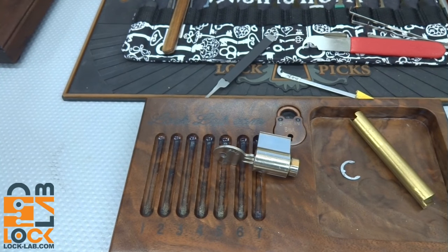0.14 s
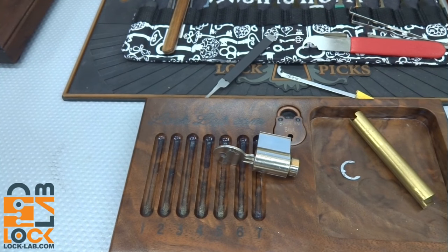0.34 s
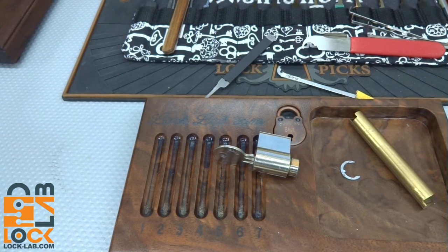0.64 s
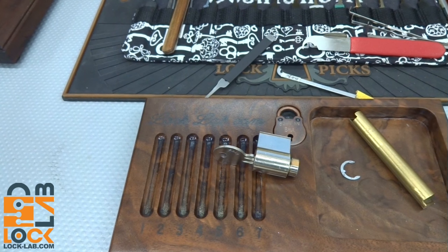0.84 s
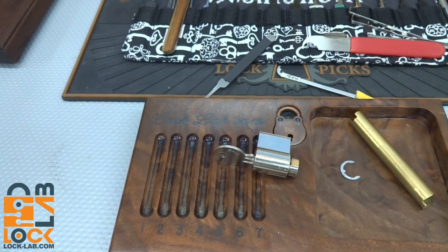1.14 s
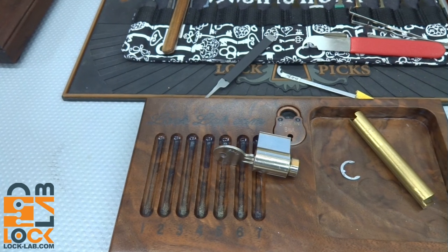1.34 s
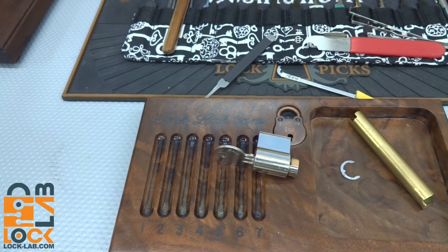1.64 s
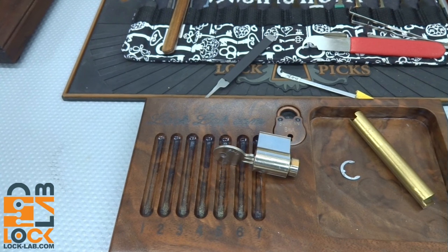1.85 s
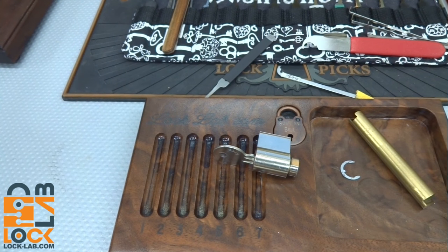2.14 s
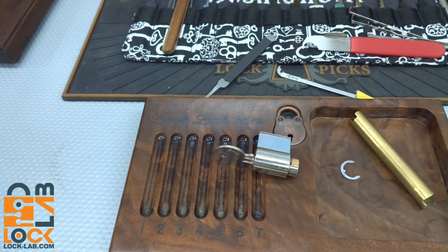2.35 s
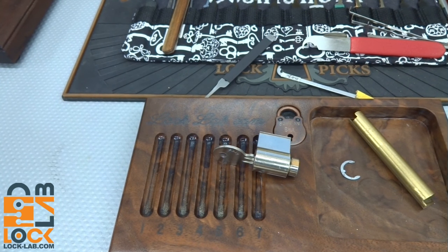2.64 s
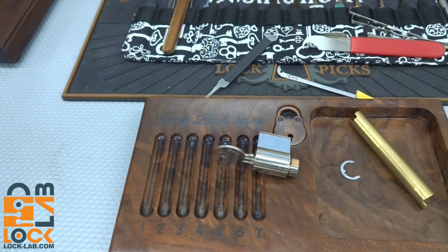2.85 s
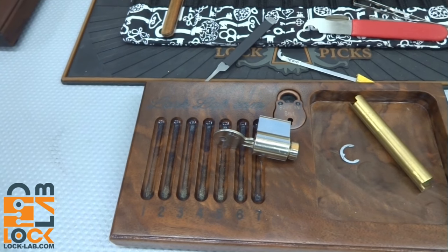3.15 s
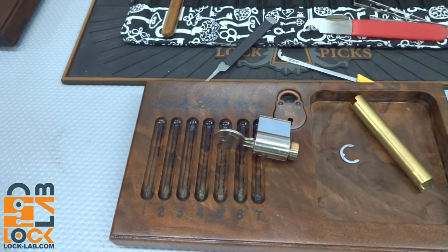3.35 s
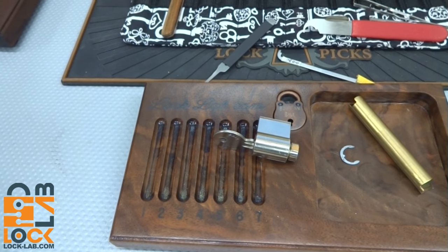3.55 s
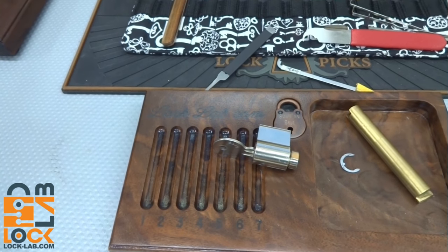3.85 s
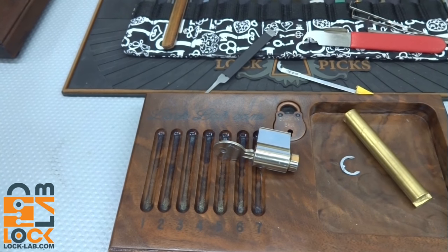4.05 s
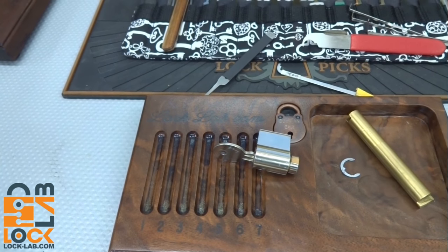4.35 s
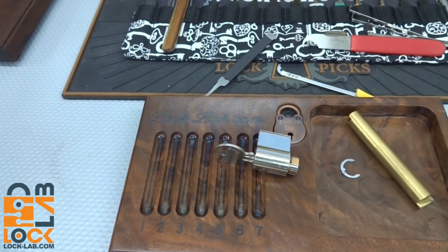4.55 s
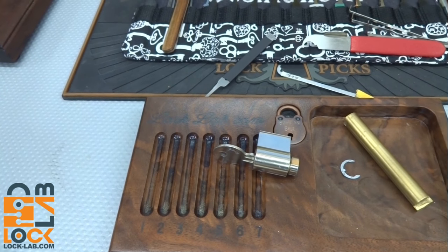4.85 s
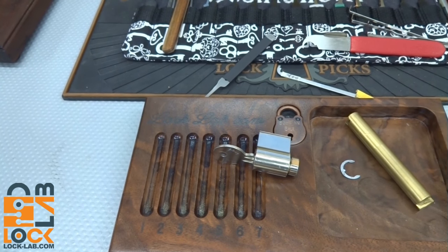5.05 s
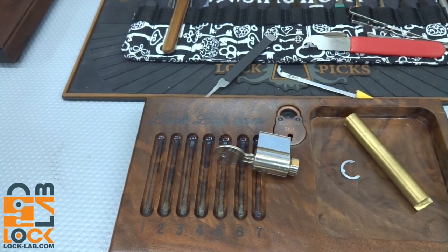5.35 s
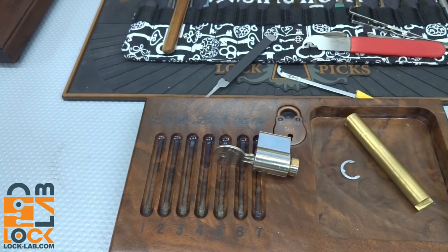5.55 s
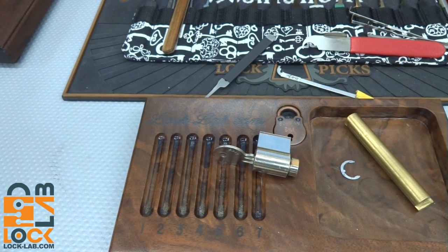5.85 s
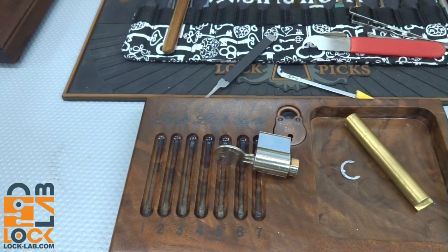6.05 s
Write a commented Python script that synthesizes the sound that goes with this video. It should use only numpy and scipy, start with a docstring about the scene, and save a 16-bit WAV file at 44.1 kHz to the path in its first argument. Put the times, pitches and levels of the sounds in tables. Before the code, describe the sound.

Metal tools clatter and scrape against wood and each other in two busy bursts, with a wavering metallic ring, tiny ticks and faint hiss.

```python
"""Small steel tools are rummaged through in a drawer: random tiny contacts, coloured by the drawer, make their
knocks, chatter and scrapes. A long bar sings while it is dragged, dangling parts tick, and thin tools ring
briefly, all as wavering modes; a tool also rasps on a wooden edge. Sparse reflections make a small hard room
over a faint hiss. The sound starts to the left, then mostly leans right, and gain control holds the blows down."""
import sys
import numpy as np
from scipy import signal
from scipy.fft import rfft, irfft
from scipy.io import wavfile
from scipy.ndimage import uniform_filter1d

SR = 44100
rng = np.random.default_rng(int(sys.argv[2]) if len(sys.argv) > 2 else 0)


def attenuation_scalar(level_db):
    """Turn a level in dB into a linear amplitude multiplier (20 dB per decade)."""
    decades = np.asarray(level_db, float) / 20
    return 10 ** decades


def wrap_up_sound(samples):
    """Save the sound to the file named by the first command line argument, as 16-bit audio."""
    columns = np.atleast_2d(samples).T
    # keep every value between -1 and 1, then stretch to whole-number steps
    tamed = np.clip(columns, -1, 1)
    steps = np.round(tamed * 32767).astype(np.int16)
    wavfile.write(sys.argv[1], SR, steps)


N = 273841  # length in samples


def evened(x):
    """Scale to an rms of one."""
    return x / np.sqrt(np.mean(x ** 2) + 1e-20)


def read(points, hz):
    """Read a curve between its points, along a logarithmic frequency axis."""
    point_hz, value = np.transpose(points)
    return np.interp(np.log(hz + 1), np.log(point_hz + 1), value)


def add(mix, start_s, sound):
    """Lay a sound into the mix, cut off where the mix ends."""
    part = mix[round(start_s * SR):][:len(sound)]
    part += sound[:len(part)]


def contacts(count, per_s, spread_db):
    """Tiny metal contacts at random moments, each a short buzz, a few of them large."""
    size_db = spread_db * np.minimum(rng.exponential(size=count), 4)
    strikes = attenuation_scalar(size_db) * (rng.random(count) < per_s / SR)
    envelope = signal.lfilter([1], [1, -np.exp(-1 / (0.0022 * SR))], strikes)  # fades over 2.2 ms
    return evened(envelope * rng.standard_normal(count))


def waver(hz, width_hz, count):
    """A mode whose strength and phase drift as the tool turns and its neighbours touch it."""
    noise = rng.standard_normal(count + 4000) + 1j * rng.standard_normal(count + 4000)
    r = np.exp(-np.pi * width_hz / SR)
    drift = signal.lfilter([1], np.convolve([1, -r], [1, -r]), noise)[-count:]
    drift = drift / abs(drift) ** 0.15  # phase roams freely, strength less far
    return evened((drift * np.exp(2j * np.pi * hz * np.arange(count) / SR)).real)


# The faint hiss's tone. Each row: frequency in Hz, relative level in dB per Hz.
HISS_TONE = [(18, -43), (30, -34), (303, -13.5), (426, -5), (584, -7.5), (721, -5), (1910, -8.5),
             (2290, -15.5), (4650, -15.5), (12600, -26), (16500, -35)]


def hiss():
    """Steady room and microphone hiss: filtered noise, mostly different in the two channels."""
    left, right, both = rng.standard_normal((3, N))
    shape = attenuation_scalar(read(HISS_TONE, np.fft.rfftfreq(N, 1 / SR)))
    noise = both + 2.8 * np.array([left, right])
    return attenuation_scalar(-56) * evened(irfft(rfft(noise) * shape, N))


# Where the wood thud, hollow knock, blow and bright jingle sit, in Hz.
COLOUR_HZ = (200, 700, 2400, 13000)


def tilt_db(hz, thud_db, knock_db, jingle_db):
    """How much wood, hollow and small steel take part, beside the blow itself at 0 dB."""
    return read(list(zip(COLOUR_HZ, (thud_db, knock_db, 0, jingle_db))), hz)


# Common colour of drawer and microphone. Each row: frequency in Hz, level in dB.
DRAWER = [(30, -27.5), (60, -17.5), (130, 4.5), (300, -1), (650, -3), (1100, -5.5), (1800, -5.5),
          (2800, -10), (4500, -9.5), (7000, -12), (11000, -13.5), (16000, -22), (22050, -55)]


def colour_db(hz, thud_db, knock_db, jingle_db):
    """The drawer's colour, tilted by the parts that join in."""
    return read(DRAWER, hz) + tilt_db(hz, thud_db, knock_db, jingle_db)


# Tools sliding over each other; heavy ones drag low and dull, light ones bright.
# Each row: time in seconds, relative scrape level in dB, weight in dB.
SCRAPE = [(0.0, -54.5, 7), (0.59, -49, 3), (0.73, -35, 6.5), (0.95, -26.5, 2), (1.16, -33, 9.5),
          (1.42, -23.5, 1.5), (1.59, -23.5, 5), (1.73, -15.5, -5), (1.85, -31, 1.5), (2.06, -56, 5),
          (2.33, -45.5, -9.5), (2.63, -33, -19), (2.96, -39, -16), (3.03, -22, 10), (3.22, -37.5, -3),
          (3.32, -21, -3), (3.531, -39, 8), (3.76, -26.5, -3.5), (3.98, -31.5, -3.5), (4.201, -42, -1.5),
          (4.439, -39, 4), (4.62, -48, 10.5), (4.9, -53.5, 1), (5.14, -46, -16), (5.31, -43, -5.5),
          (5.6, -64, 1), (6.21, -58, -15.5)]
# Colour at weight 0: wood thud, hollow knock and bright jingle, in dB.
SCRAPE_COLOUR_DB = (-18, -4, -3.5)
# Change of thud, knock and jingle, in dB for one dB of weight.
WEIGHT_SHARE = (1.25, 0.72, -0.75)


def scrape():
    """Dense sliding contacts whose colour follows the weight being dragged, in drifting patches."""
    hz, t, z = signal.stft(contacts(N, 1500, 0.5), SR, nperseg=512, noverlap=384)
    s, *columns = np.transpose(SCRAPE)
    level_db, weight_db = (np.interp(t, s, column) for column in columns)
    weight_colour_db = np.outer(tilt_db(hz, *WEIGHT_SHARE), weight_db)
    field_db = colour_db(hz, *SCRAPE_COLOUR_DB)[:, None] + level_db + weight_colour_db
    patches = uniform_filter1d(rng.standard_normal(z.shape), size=3, axis=0)
    patches = evened(uniform_filter1d(patches, size=16, axis=1))
    gain = attenuation_scalar(field_db + 2.74 * patches + 10)
    return signal.istft(z * gain, SR, nperseg=512, noverlap=384)[1][:N]


# How fast the room dies away. Each row: frequency in Hz, time to fall 60 dB in seconds.
ROOM = [(150, 0.44), (700, 0.41), (2500, 0.43), (6000, 0.36), (14000, 0.35)]
# How unlike the echoes are at the two microphone ports. Each row: frequency in Hz, level in dB.
WIDTH = [(60, -37), (200, -31), (600, -11), (2000, -11.5), (6000, -8), (14000, -8.5)]


def room(x):
    """Sparse reflections of random sign, each band dying at its own speed; one tail shared, one opposed."""
    taps = np.zeros((2, SR // 2))
    slots = np.arange(200, SR // 2 - 20, 20)
    at = slots + rng.integers(0, 20, (2, len(slots)))
    np.put_along_axis(taps, at, rng.choice([-1., 1.], at.shape), 1)
    hz, t, z = signal.stft(taps, SR, nperseg=256)
    z[1] *= attenuation_scalar(read(WIDTH, hz))[:, None]
    fade = attenuation_scalar(-60 * t / read(ROOM, hz)[:, None])
    tail = signal.istft(z * fade, SR, nperseg=256)[1]
    tail = tail / np.linalg.norm(tail[0])
    shared, unlike = signal.fftconvolve(x[None], tail, axes=1)[:, :N]
    return np.array([shared + unlike, shared - unlike])


# Where the hand works. Each row: time in seconds, left minus right in dB.
LEAN = [(0.0, 2.5), (0.5, -2.5), (3.2, -2.5), (3.8, -0.6), (4.35, -3), (4.66, 0), (4.87, -3), (6.2, -1)]


def lean(heard):
    """Tip the sound left or right, except the bass: long waves reach both ports alike."""
    bass = signal.lfilter(*signal.butter(1, 250, fs=SR), heard)
    lean_db = np.interp(np.arange(N) / SR, *np.transpose(LEAN))
    return bass + (heard - bass) * attenuation_scalar(np.outer([.5, -.5], lean_db))


def minimum_phase(level_db):
    """Turn a colour into a filter of unit energy that answers as early as it can."""
    cepstrum = irfft(np.log(attenuation_scalar(level_db)))
    cepstrum[1:1024] *= 2
    cepstrum[1025:] = 0
    causal = irfft(np.exp(rfft(cepstrum)))
    return causal / np.linalg.norm(causal)


def ringing_parts(t):
    """The blow itself, then a handful of small parts ringing for an instant at scattered pitches."""
    part_hz = np.geomspace(400, 14000, num=50)[:, None] * rng.uniform(0.93, 1.04, (50, 1))
    part_db = 3 * rng.standard_normal((50, 1))
    parts = (attenuation_scalar(part_db - 60 * t / 0.036) * np.sin(2 * np.pi * part_hz * t)).sum(0)
    parts = .33 * parts / np.linalg.norm(parts)
    parts[0] += 1
    return parts


# Modes of the wooden top. Each row: frequency in Hz, relative level in dB, time to fall 60 dB in seconds.
TABLE_TOP = [(70, -12.5, 0.26), (135, -2.5, 0.15), (263, -4, 0.63), (355, -4, 0.099)]


def hit(db, thud_db, knock_db, jingle_db, t60):
    """A blow and the chatter after it pass the drawer colour, briefly ringing parts and the table top."""
    t = np.arange(SR // 3) / SR
    rise_s = 0.003 * attenuation_scalar(-.45 * (db + 11.5))  # hard blows start sharply, light ones slide in
    chatter = contacts(len(t), 2500, 1.5) * attenuation_scalar(-60 * t / t60) * np.minimum(t / rise_s, 1)
    drawer = minimum_phase(colour_db(np.fft.rfftfreq(2048, 1 / SR), thud_db, knock_db, jingle_db))
    modes = sum(attenuation_scalar(d - 60 * t / ring_s) * np.sin(2 * np.pi * f * t) for f, d, ring_s in TABLE_TOP)
    body = modes * attenuation_scalar(thud_db - 34.5)
    add(body, 0, signal.fftconvolve(drawer, ringing_parts(t[:4096])))
    return attenuation_scalar(db - 1.5) * signal.fftconvolve(chatter, body)


# Steel meets steel. Each row: start in seconds, relative blow level in dB, hollow knock and bright jingle
# in dB beside the blow, time for the chatter to fall 60 dB in seconds.
CLACKS = [(0.079, -32, -9.5, -10.5, 0.53), (0.1192, -32, -2.5, -17, 0.24), (0.5251, -36.5, -8, 5, 0.14),
          (0.619, -28, -4, -3, 0.16), (0.66, -23, -4, 0, 0.086), (0.8076, -18.5, -48, -4, 0.23),
          (0.849, -7.5, -23, -22, 0.043), (1.05, -24.5, -26, -9, 0.1), (1.229, -26.5, -11, 26, 0.068),
          (1.4172, -15.5, -12, -2.5, 0.26), (1.4694, -16, -28, -5, 0.17), (1.6114, -10.5, 2, 1, 0.13),
          (2.0686, -33, -25, 11, 0.13), (2.108, -28.5, -21, -1, 0.052), (3.005, -21, -8, 15, 0.35),
          (3.357, -15, -4, 21, 0.16), (3.43, -24, -8, 16, 0.15), (3.5501, -12, -15, 0, 0.18),
          (3.618, -19.5, -1, 0, 0.058), (3.7886, -9.5, -14, 7, 0.06), (3.8285, -20, 4, -4, 0.099),
          (3.9054, -17, -13, -4, 0.14), (3.955, -11.5, -13, 12, 0.07), (3.991, -13.5, -19.5, -5.5, 0.089),
          (4.089, -17.5, -19, 22, 0.1), (4.9561, -29, -12, -9, 0.063), (5.0425, -37, -25, 0, 0.27),
          (5.0846, -30, -42, -7, 0.24), (5.1186, -30, -32, -11, 0.12), (5.2481, -27, -39, -18, 0.083),
          (5.2823, -20.5, -16, -2, 0.067), (5.4202, -30, -28, -4, 0.06), (5.4849, -23, -33, 15, 0.069),
          (5.5714, -32, -16, 0, 0.072), (5.7, -34, -11, 16, 0.054), (5.862, -36, -28, 3, 0.047),
          (5.908, -37, -18, -5, 0.059)]


def clacks(mix):
    """Steel on steel: blows with hardly any wood thud."""
    for start_s, db, *row in CLACKS:
        add(mix, start_s, hit(db, -40.5, *row))


# Tools land on the wooden drawer. Each row: start in seconds, relative blow level in dB, wood thud and
# hollow knock in dB beside the blow, time for the chatter to fall 60 dB in seconds.
THUMPS = [(0.7551, -10, -14.5, 2, 0.065), (0.7656, -15, -19.5, -0.5, 0.19),
          (0.9114, -13, -12, -11.5, 0.087), (0.9297, -13, -24, -5, 0.35), (0.9982, -17.5, -34, -15, 0.22),
          (1.297, -23, -19.5, -3.5, 0.29), (1.3486, -22, -28, -12, 0.1), (1.5798, -13, -23, 4, 0.075),
          (2.9868, -11.5, -5, 4, 0.29), (3.0276, -15.5, -4, -12, 0.24), (3.0785, -18.5, 5, 13, 0.11),
          (3.112, -11, 1, 4.5, 0.1), (3.235, -20, -33, -4, 0.17), (3.261, -6.5, -12, -3, 0.16),
          (3.3, -15, -5, -2.5, 0.14), (3.7193, -10, -23, -4.5, 0.22), (3.758, -14, -30, -10, 0.2),
          (4.2576, -32.5, -12, -12, 0.28), (4.3, -25.5, -6, -10, 0.058), (4.4194, -11.5, -27, -6.5, 0.14),
          (4.4479, -17, -20, 3, 0.12), (4.495, -16.5, -34, -2.5, 0.07), (4.5495, -28, -6, -17, 0.052),
          (5.92, -40.5, -17, 10, 0.19)]


def thumps(mix):
    """Steel on wood: blows with their own thud and knock and a fixed, low jingle."""
    for start_s, db, thud_db, knock_db, t60 in THUMPS:
        add(mix, start_s, hit(db, thud_db, knock_db, -11, t60))


# Bending modes of the long bar, some in close pairs across its two axes. Each row: frequency in Hz,
# relative level in dB, time to fall 60 dB in seconds, waver width setting in Hz.
BAR = [(421.4, -11, 7, 30), (786, -19, 1.3, 26), (1157, -1.8, 9.7, 26), (1170, -6.5, 5.7, 19),
       (2236, -4.5, 5.3, 36), (2304, -5, 4., 99), (2275, -5.5, 2.4, 23), (3757, -2, 1.3, 71),
       (3794, -10.5, 2.6, 67), (5610, -3, 0.92, 90), (7700, -11, 0.73, 70), (7910, -2.5, 0.53, 31),
       (10260, -8.5, 0.38, 80)]
# Rubbing that drives the bar. Each row: time in seconds, relative strength in dB.
BAR_DRAG = [(.9, -78), (.93, -35), (1.1, -72), (1.45, -37), (1.62, -46.5), (1.74, -35.5), (1.86, -59),
            (2.1, -73), (2.95, -62), (3., -76)]


def bar():
    """Rubbing feeds energy to each mode, which drains at its own speed; laying the bar down stops it."""
    t = np.arange(N) / SR
    drag_power = attenuation_scalar(2 * np.interp(t, *np.transpose(BAR_DRAG)))
    out = np.zeros(N)
    for hz, db, t60, width_hz in BAR:
        keep = np.exp(-2 * np.log(1000) / t60 / SR)  # share of energy left after one sample
        energy = signal.lfilter([1 - keep], [1, -keep], drag_power)
        out += attenuation_scalar(db) * np.sqrt(energy) * waver(hz, width_hz, N)
    laid_down_s = 2.99
    return 2 * out * attenuation_scalar(-400 * np.maximum(t - laid_down_s, 0))


def ring(modes, db, free_s):
    """A struck tool rings in its modes until something touches it."""
    t = np.arange(round((free_s + 0.11) * SR)) / SR
    tone = sum(attenuation_scalar(mode_db - 60 * t / t60) * waver(hz, width_hz, len(t))
               for hz, mode_db, t60, width_hz in modes)
    return attenuation_scalar(db - 400 * np.maximum(t - free_s, 0)) * tone  # the touch: 400 dB a second


# Modes of a rod. Each row: frequency in Hz, relative level in dB, time to fall 60 dB in seconds,
# waver width setting in Hz.
ROD = [(423.4, -6.5, 1.45, 16), (1970, -13.5, 2.2, 44), (4040, -8, 0.95, 58), (4700, -3, 0.71, 120),
       (10400, -16, 0.54, 69)]
# Each row: start in seconds, relative strike level in dB, free ringing time in seconds.
ROD_RINGS = [(1.745, -32, 0.089), (4.1, -51, .3), (4.418, -43, 0.72), (4.955, -70, .9)]


def rod(mix):
    """A struck rod rings in its few wavering modes."""
    for start_s, *row in ROD_RINGS:
        add(mix, start_s, ring(ROD, *row))


# The clearest ticks of small dangling parts. Each row: start in seconds, relative level in dB.
TICKS = [(2.3084, -36), (2.6123, -13.5), (2.6483, -12.5), (2.6923, -9.5), (2.7555, -12), (2.7787, -19),
         (2.872, -11), (2.9113, -13.5), (2.9466, -13)]
# Their wood thud, hollow knock and bright jingle, in dB beside the blow.
TICK_COLOUR_DB = (-43, -23, 27.5)


def ticks(mix):
    """Dangling parts tick together as the bar is carried: clear ticks, and others while they swing."""
    gap_s = 0.02
    s = np.arange(2.54, 2.84, gap_s)
    late, size = rng.uniform(-1.2, 1, (len(s), 2)).T  # uneven gaps and levels
    swinging = list(zip(s + late * gap_s / 2, -21 + 7.5 * size))
    for start_s, db in TICKS + swinging:
        add(mix, start_s, hit(db, *TICK_COLOUR_DB, t60=0.04))


# Modes of a wrench. Each row: frequency in Hz, relative level in dB, time to fall 60 dB in seconds,
# waver width setting in Hz.
WRENCH = [(597, -11, .4, 45), (672, -11, .3, 45), (2455, -7, .25, 70), (2978, -3, .3, 90),
          (5435, -2.5, .4, 85), (7080, -10, .25, 50), (8233, -9, .25, 50), (9200, -5, .3, 70),
          (11820, -14, .25, 70)]
# Each row: start in seconds, relative strike level in dB, free ringing time in seconds.
WRENCH_RINGS = [(3.551, -24.5, 0.43)]


def wrench(mix):
    """A struck wrench rings in low and high wavering modes."""
    for start_s, *row in WRENCH_RINGS:
        add(mix, start_s, ring(WRENCH, *row))


# Modes of a blade. Each row: frequency in Hz, relative level in dB, time to fall 60 dB in seconds,
# waver width setting in Hz.
BLADE = [(4940, -5, 0.06, 70), (8400, -19, 0.25, 40), (8900, -9.5, 0.97, 55), (10100, -7, 0.42, 48),
         (10800, 5.5, 0.17, 100)]
# Each row: start in seconds, relative strike level in dB, free ringing time in seconds.
BLADE_RINGS = [(3.959, -40.5, 0.1), (4.091, -35, 0.19)]


def blade(mix):
    """A struck blade rings in high wavering modes only."""
    for start_s, *row in BLADE_RINGS:
        add(mix, start_s, ring(BLADE, *row))


# A tool rasps along a wooden edge. Each row: time in seconds, relative level in dB, resonance in Hz.
RASP = [(4.961, -21, 1680), (4.99, -48, 1740), (5.12, -32, 1960), (5.21, -39, 2600), (5.27, -41, 2350),
        (5.4, -64, 2200)]


def rasp(mix):
    """Quick slips excite one broad resonance that moves with the point of contact."""
    s, *columns = np.transpose(RASP)
    t = np.arange(s[0], s[-1], 1 / SR)
    db, hz = (np.interp(t, s, column) for column in columns)
    turn = np.exp(2j * np.pi * np.cumsum(hz) / SR)
    r = np.exp(-np.pi * 1300 / SR)
    # shift the slips down to 0 Hz, smooth them there, and shift them back up
    body = signal.lfilter([1], np.convolve([1, -r], [1, -r]), contacts(len(t), 800, 1.7) / turn)
    sound = attenuation_scalar(db - 4) * evened((turn * body).real)
    add(mix, s[0], sound * signal.windows.tukey(len(t), .1))


# Modes of a thin pick. Each row: frequency in Hz, relative level in dB, time to fall 60 dB in seconds,
# waver width setting in Hz.
PICK = [(2085, -13, 0.39, 50), (4080, -15, 0.63, 34), (4730, -15, 0.89, 82), (5160, -18, 3.6, 75),
        (6158, -8, 1.1, 160), (8000, -23, 1.2, 50), (9690, -14, 0.92, 53), (10650, 0, 0.2, 48),
        (10930, -6, 0.76, 35), (11750, -32, 2.2, 30)]
# Each row: start in seconds, relative strike level in dB, free ringing time in seconds.
PICK_RINGS = [(5.29, -47, 0.14), (5.489, -40, 0.24), (5.545, -46, 0.13)]


def pick(mix):
    """A struck thin pick rings briefly, brightest near the top."""
    for start_s, *row in PICK_RINGS:
        add(mix, start_s, ring(PICK, *row))


def scene():
    """All the tools, their room, their place from left to right, and the hiss."""
    tools = scrape() + bar()
    for source in (clacks, thumps, rod, ticks, wrench, blade, rasp, pick):
        source(tools)
    heard = tools + attenuation_scalar(-3.5) * room(tools)
    return lean(heard) + hiss()


def low_pass(x):
    """Removes everything above the highest recorded frequency."""
    return signal.sosfilt(signal.butter(12, 15850, fs=SR, output="sos"), x)


def record(dry):
    """Gain control falls at once on a loud blow and creeps back; then peaks round off."""
    power_db = 10 * np.log10(abs(uniform_filter1d((dry ** 2).mean(0), size=200)) + 1e-12)
    fall_db = np.arange(N) * 60. / SR  # the remembered loudness sinks 60 dB a second
    remembered_db = np.maximum.accumulate(power_db + fall_db) - fall_db
    over_db = np.maximum(remembered_db + 14, 0)
    held = dry / attenuation_scalar(0.38 * uniform_filter1d(over_db, size=100))
    ceiling = .7
    rounded = ceiling * np.tanh(held / ceiling)
    # the input blocks deep bass
    finished = signal.lfilter(*signal.butter(2, 38, "high", fs=SR), rounded)
    return low_pass(finished)


dry = scene()
out = record(dry)
wrap_up_sound(out)
```